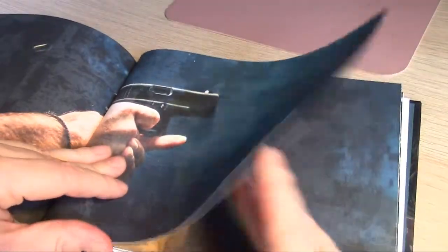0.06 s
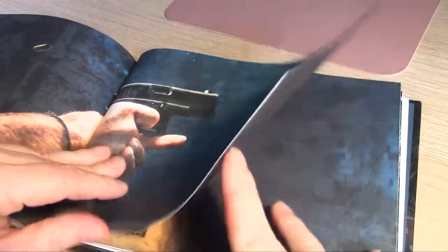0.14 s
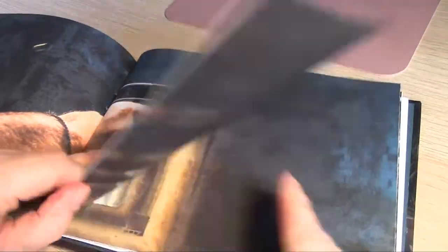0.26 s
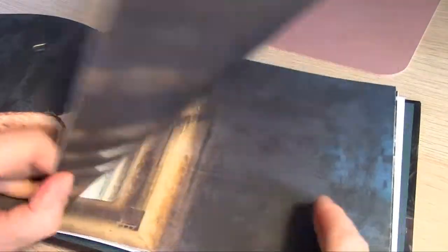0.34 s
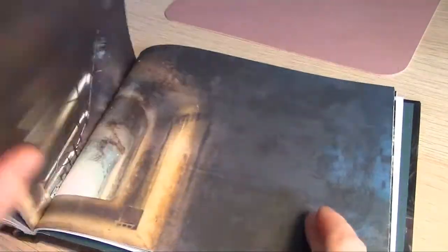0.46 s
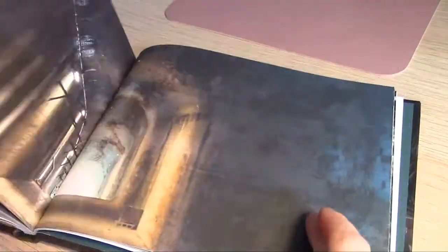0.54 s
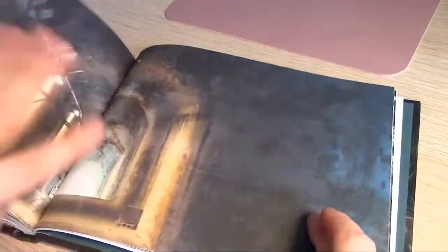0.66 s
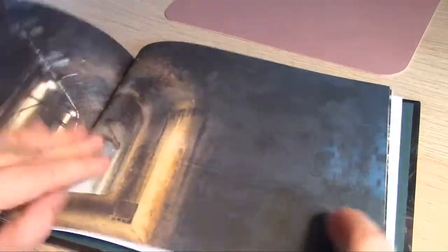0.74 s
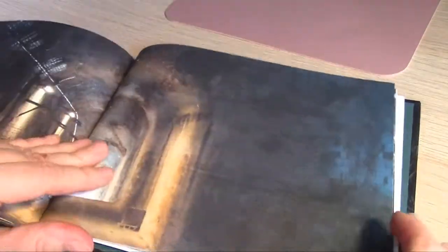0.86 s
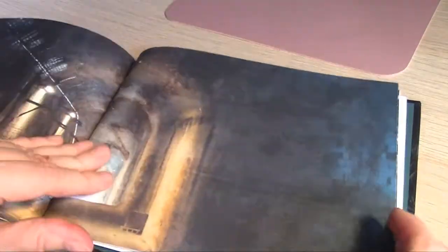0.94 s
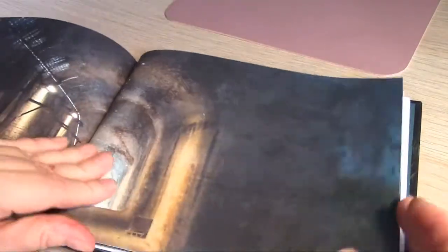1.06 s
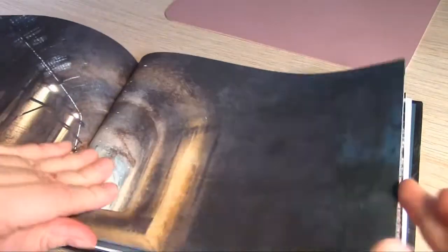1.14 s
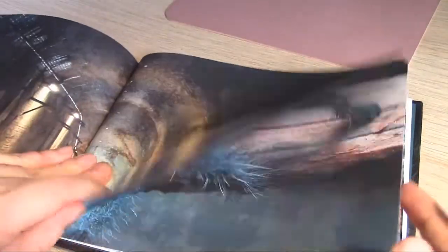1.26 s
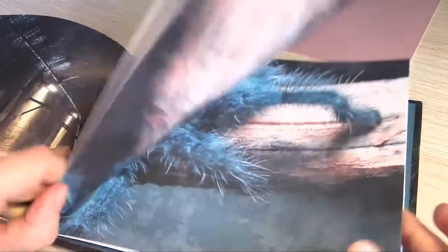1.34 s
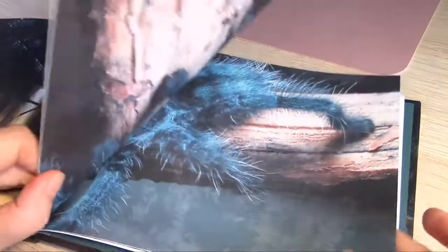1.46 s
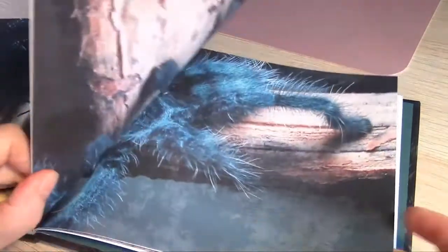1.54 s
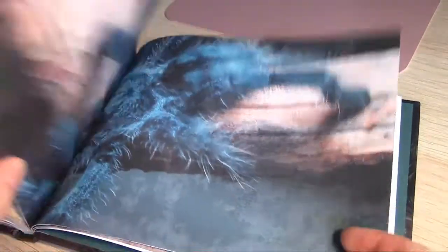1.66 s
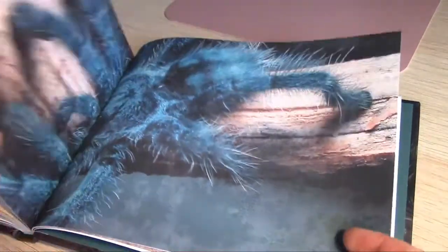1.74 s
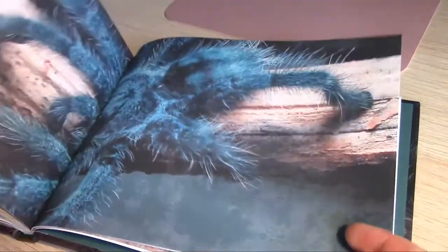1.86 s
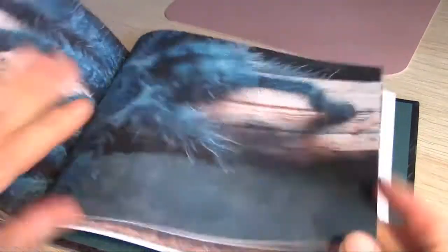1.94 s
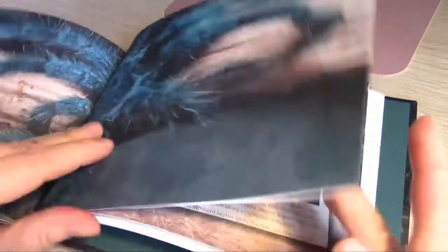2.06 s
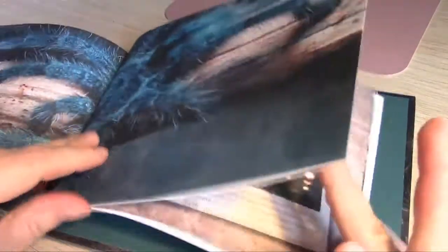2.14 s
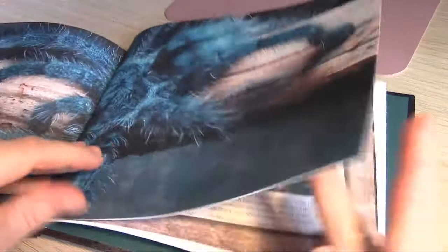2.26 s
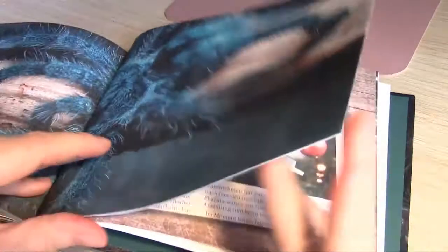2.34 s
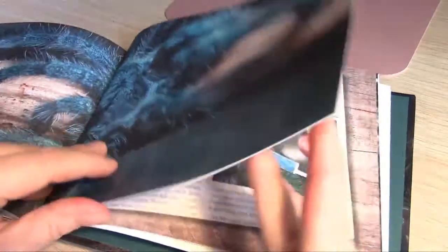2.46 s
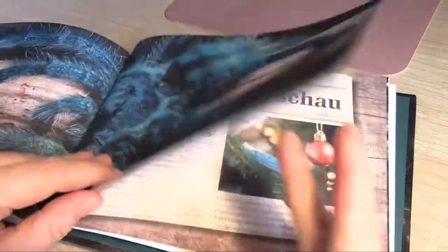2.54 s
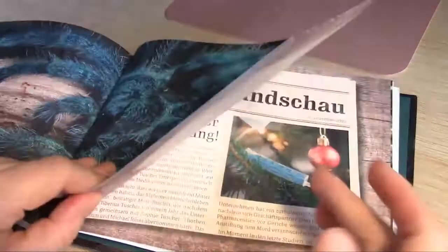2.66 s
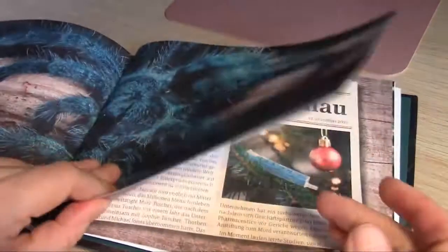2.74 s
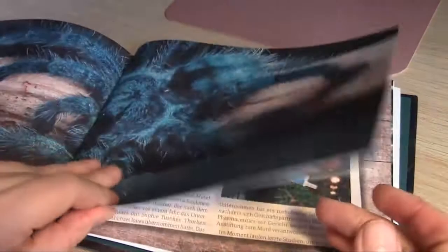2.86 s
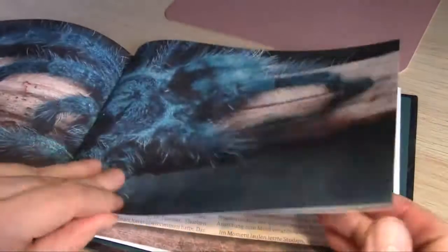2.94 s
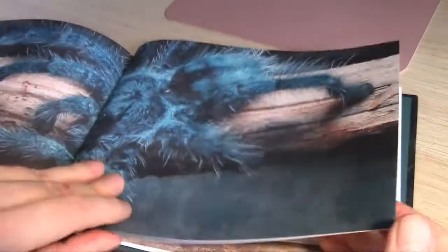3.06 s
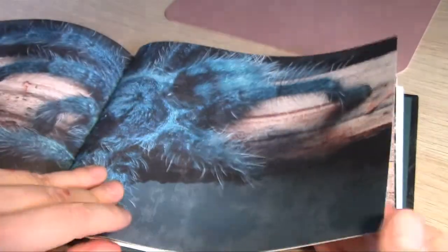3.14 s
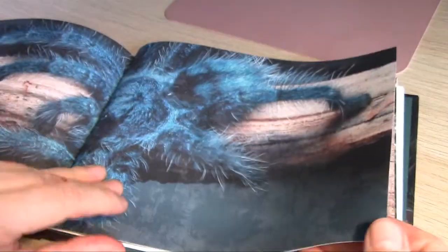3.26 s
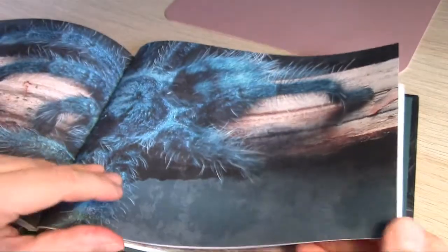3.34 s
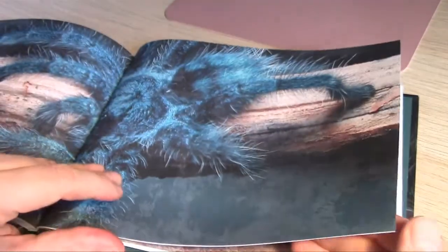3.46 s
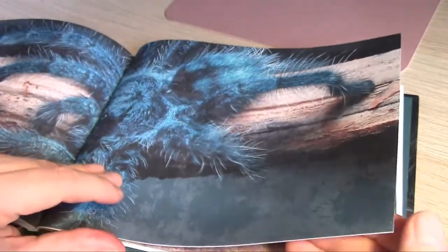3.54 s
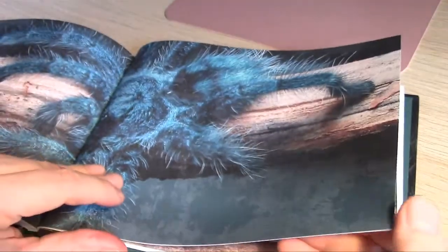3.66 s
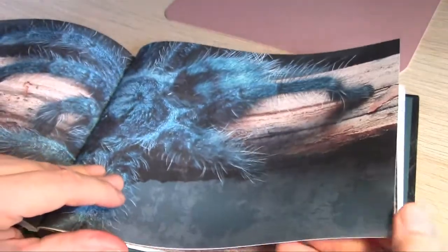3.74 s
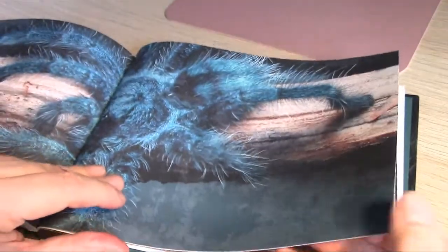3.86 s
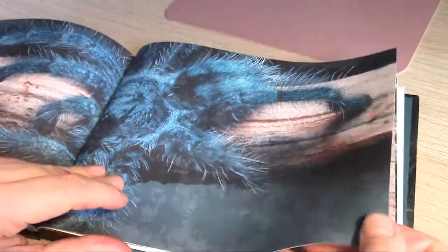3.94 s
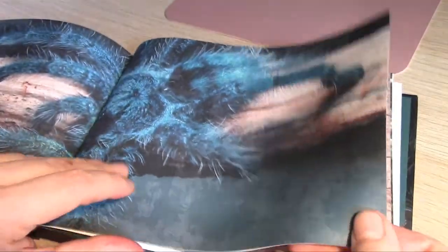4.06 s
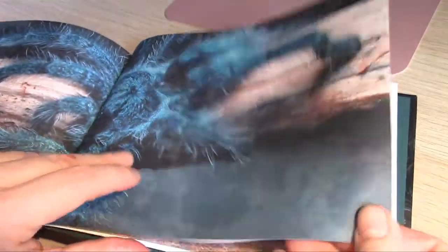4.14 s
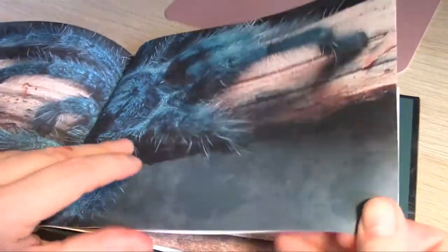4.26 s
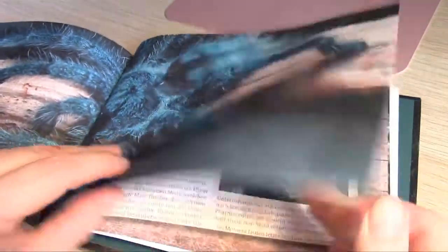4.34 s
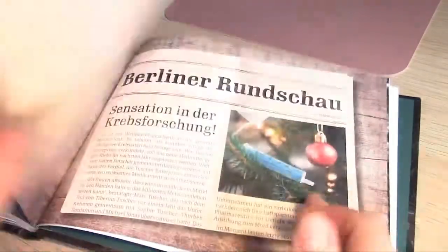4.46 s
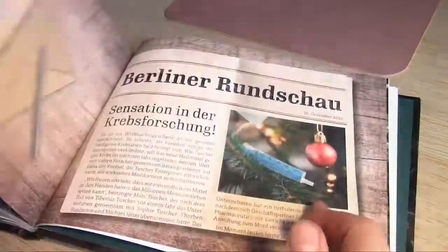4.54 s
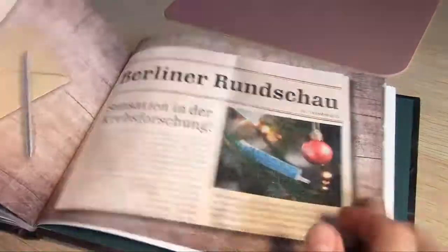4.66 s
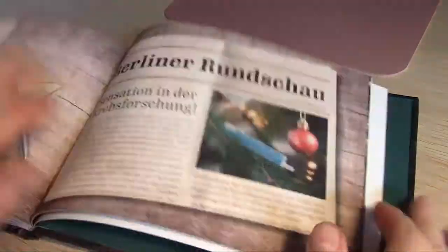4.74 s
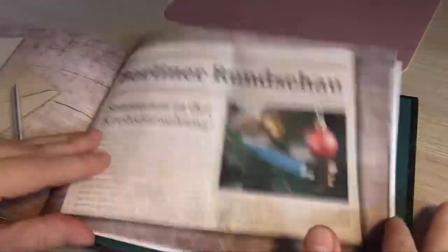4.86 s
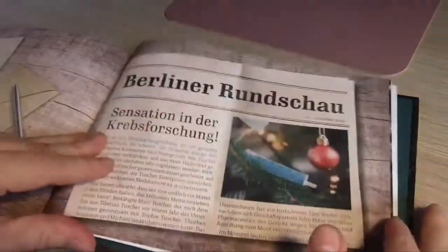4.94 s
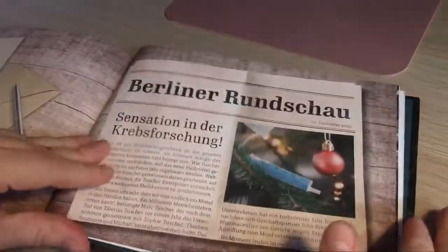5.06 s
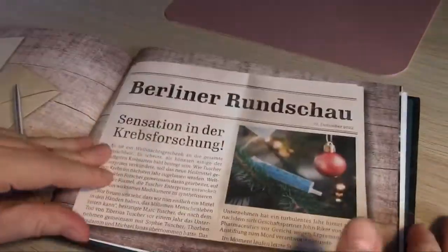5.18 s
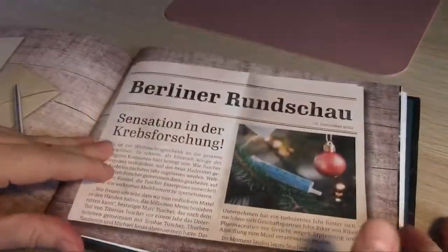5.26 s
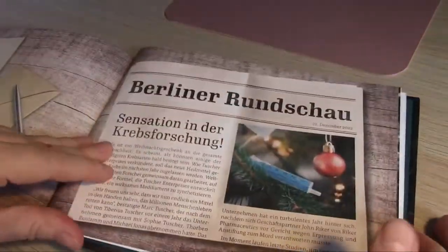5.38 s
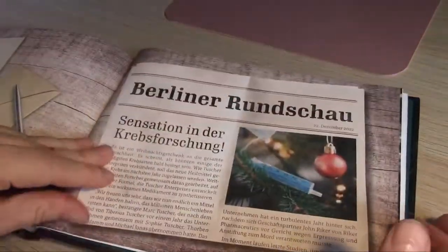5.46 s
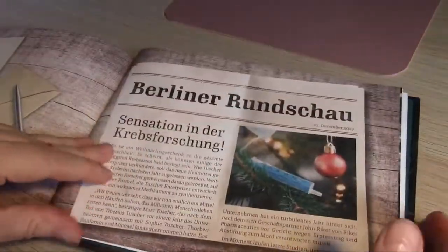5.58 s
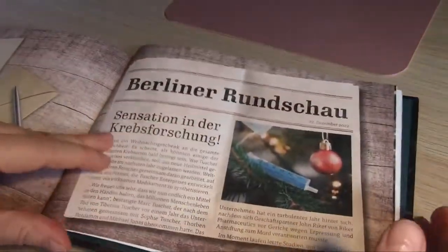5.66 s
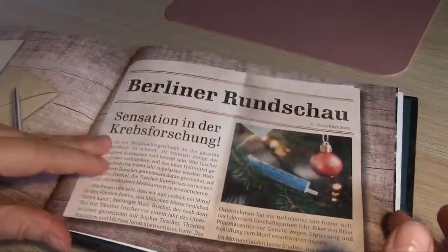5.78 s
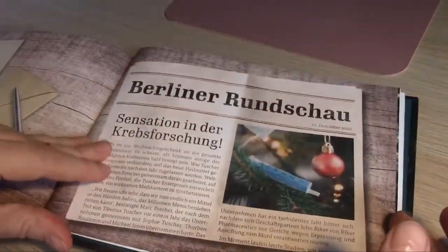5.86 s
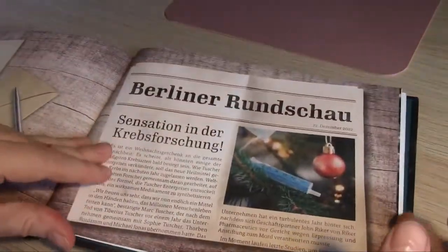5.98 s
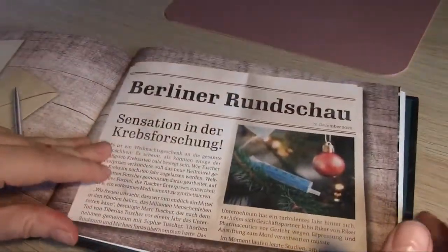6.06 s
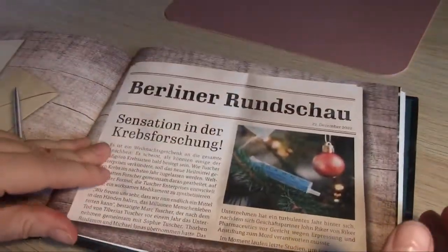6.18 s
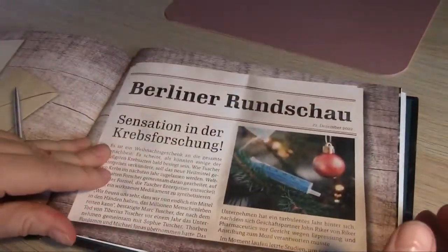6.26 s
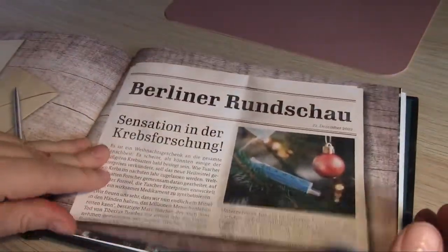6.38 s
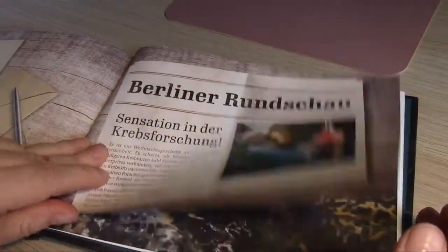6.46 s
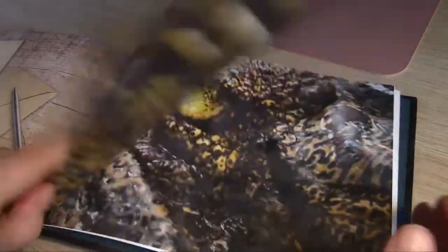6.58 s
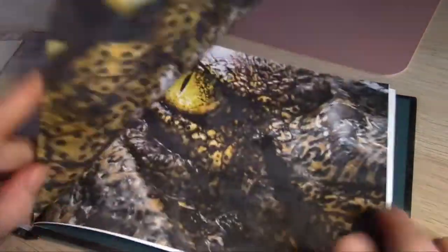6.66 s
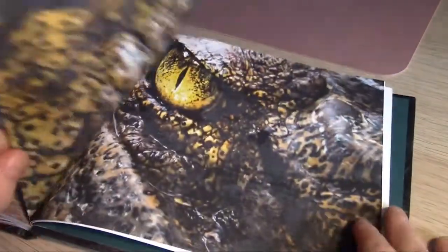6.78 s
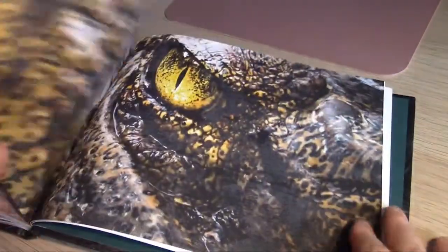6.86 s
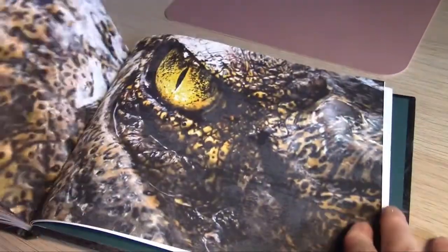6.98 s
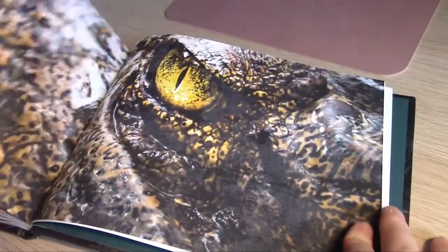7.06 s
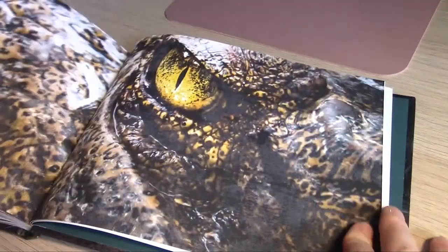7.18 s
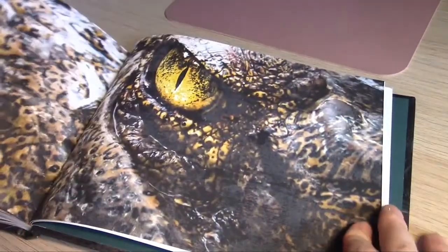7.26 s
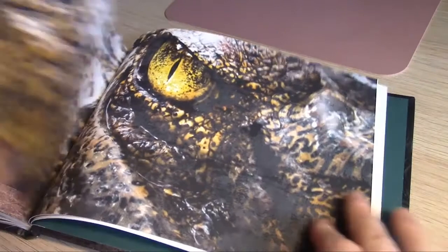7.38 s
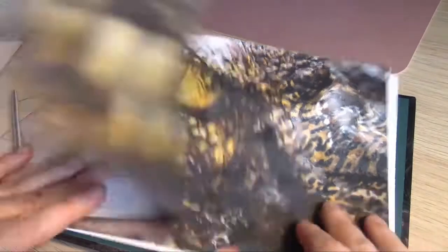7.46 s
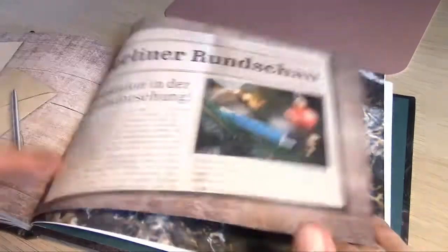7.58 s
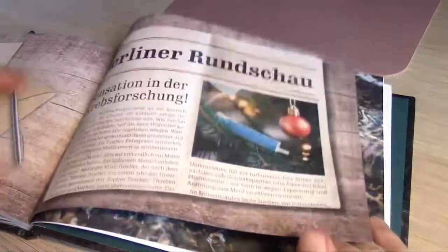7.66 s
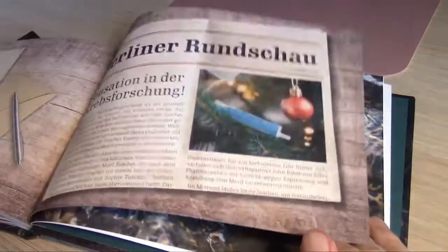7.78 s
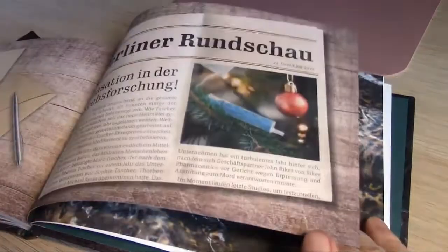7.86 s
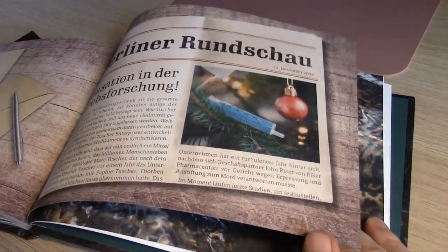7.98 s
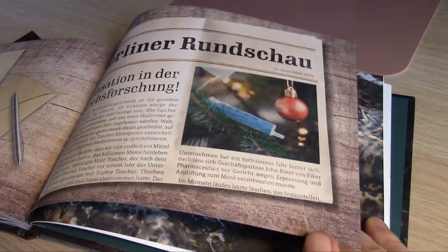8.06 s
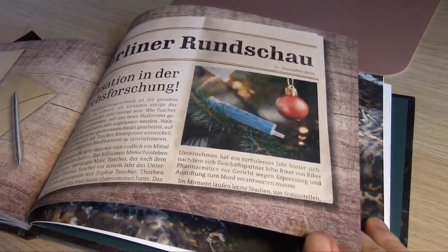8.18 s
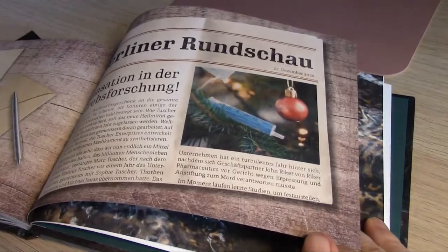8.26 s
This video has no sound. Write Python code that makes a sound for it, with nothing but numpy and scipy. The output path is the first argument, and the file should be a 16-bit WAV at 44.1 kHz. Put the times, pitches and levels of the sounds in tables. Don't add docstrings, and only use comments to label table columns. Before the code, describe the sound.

Stiff glossy pages turned close by: grainy hiss, one hard early knock, edge ticks, hollow pops, a soft lull, then brisk slides again.

```python
import sys
import numpy as np
from scipy import signal
from scipy.fft import rfft, irfft, next_fast_len
from scipy.io import wavfile
from scipy.ndimage import uniform_filter1d

SR = 44100
rng = np.random.default_rng(int(sys.argv[2]) if len(sys.argv) > 2 else 0)


def put_to_file(sound):
    columns = np.atleast_2d(sound).T
    safe = np.clip(columns, -1, 1)
    whole_steps = np.round(safe * 32767)
    wavfile.write(sys.argv[1], SR, whole_steps.astype(np.int16))


def boost(x):
    u = np.asarray(x, float) / 20
    return 10 ** u


N = 366912

# time_s, level_db
TOUCH = [(0, -85), (0.6, -74), (1.06, -66.5), (1.6, -60), (1.9, -64.5), (2.5, -65.5), (2.88, -68.5),
         (3.6, -71), (4.1, -65.5), (4.65, -57), (4.83, -61), (5.1, -63), (5.6, -67), (6.1, -70),
         (6.47, -72.5), (6.85, -58.5), (7.3, -62), (8.13, -68)]
TOUCH_GLOSS_DB, TOUCH_FLEX_DB, TOUCH_BULK_DB = -8, -1.5, -1.5
# peak_s, slide_db, gloss_db, rise_s
DRAGS = [(1.506, -49.5, -61, 0.45), (1.981, -52.5, -53.5, 0.024), (2.232, -48, -49, 0.14),
         (2.654, -50, -50, 0.075), (2.801, -61.5, -68, 0.095), (3.684, -64, -71, 0.1),
         (4.028, -63, -68, 0.03), (4.741, -53, -55, 0.1), (5.733, -57, -60, 0.14),
         (6.029, -64, -72.5, 0.057), (7.519, -50, -51, 0.18), (7.675, -54, -59, 0.082),
         (7.949, -56.5, -69, 0.27)]
# peak_s, slide_db, gloss_db, fall_s
FLICKS = [(0.0, -46.5, -48, 0.044), (0.062, -53, -74, 0.059), (0.272, -65, -84, 0.17),
          (0.569, -52, -61, 0.016), (1.44, -45, -48, 0.047), (2.028, -43, -51.5, 0.039),
          (2.29, -55.5, -56.5, 0.18), (2.911, -58, -59, 0.07), (4.505, -57, -49.5, 0.096),
          (4.865, -50, -54.5, 0.12), (4.943, -54, -54, 0.016), (5.5, -59, -59.5, 0.096),
          (5.949, -50.5, -55, 0.025), (6.645, -45.5, -52, 0.03), (6.925, -57.5, -51.5, 0.16),
          (7.396, -49, -52.5, 0.23), (8.163, -63, -62.5, 0.36)]
# peak_s, slide_db, gloss_db, rise_and_fall_s
SWEEPS = [(1.925, -58, -62, 0.013), (2.07, -58, -54, .02), (2.36, -57, -59, .04), (2.47, -71, -66, .015),
          (4.95, -58, -62, 0.024), (0.17, -57, -60, 0.58), (0.36, -52.5, -57.5, 0.42),
          (0.428, -49.5, -48, 0.078), (0.74, -62.5, -58.5, 0.18), (7.99, -75, -84, 0.033),
          (3.39, -70, -62.5, 0.024), (4.01, -73, -65, .02), (1.275, -70, -60.5, 0.098),
          (1.71, -50, -50.5, 0.13), (2.178, -46.5, -64, 0.042), (3.16, -56.5, -64, 0.15),
          (4.426, -55.5, -54.5, 0.12), (4.426, -50.5, -51.5, 0.023), (1.232, -62, -54, 0.016),
          (1.291, -62, -58, 0.012), (1.34, -56, -51.5, 0.019), (5.186, -57, -66, 0.053),
          (5.338, -49, -58, 0.025), (5.471, -54.5, -69, 0.0081), (5.839, -55, -61.5, 0.034),
          (6.522, -44.5, -51, 0.017), (7.151, -61, -56, 0.12), (7.81, -64, -48.5, 0.15),
          (8.32, -59, -64, 0.13)]
# start_s, end_s, slide_db, gloss_db
SWISHES = [(1.68, 1.722, -51, -50), (1.808, 1.826, -66, -58), (0.407, 0.45, -60, -60),
           (0.472, 0.503, -58, -58), (0.562, 0.578, -54, -63), (0.805, 0.88, -52, -50.5),
           (3.373, 3.448, -61, -71.5), (3.466, 3.525, -63, -75), (3.778, 3.826, -62, -68),
           (6.497, 6.535, -53.5, -56), (6.582, 6.614, -61, -63), (6.634, 6.762, -47, -47.5),
           (6.797, 6.86, -57.5, -60.5), (7.618, 7.692, -49, -60), (5.51, 5.535, -56, -56)]
# peak_s, flex_db, bulk_db, fall_s
JOLTS = [(0.269, -42, -68, 0.046), (0.587, -46, -39, 0.025), (0.827, -51, -47, 0.039),
         (2.038, -48, -47.5, 0.037), (2.585, -59, -60, 0.21), (2.95, -64, -61, 0.088),
         (4.256, -51, -57.5, 0.12), (4.482, -66, -62, 0.027), (4.85, -55.5, -56, 0.3),
         (5.505, -60, -56.5, 0.043), (5.953, -57.5, -54.5, 0.076), (7.017, -60, -54.5, 0.22),
         (7.168, -48, -49, 0.047), (7.441, -73, -55, 0.23), (7.628, -43.5, -60, 0.072)]
# peak_s, flex_db, bulk_db, rise_and_fall_s
BOWS = [(0.0, -73, -60, 0.19), (0.38, -56, -58, 0.43), (1.448, -47.5, -72, 0.048), (1.853, -79, -54, 0.095),
        (2.18, -45.5, -57, 0.059), (2.265, -43.5, -43.5, 0.05), (4.18, -60.5, -66, 0.052),
        (4.4, -61.5, -78, 0.17), (4.627, -59, -50, 0.045), (6.69, -51.5, -51.5, 0.14),
        (6.929, -51.5, -56, 0.018), (7.331, -50.5, -54.5, 0.048), (7.515, -53, -48.5, 0.053)]
# peak_s, flex_db, bulk_db, rise_s
PRESSES = [
    (0.635, -57, -52, .05),
    (0.865, -56, -52.5, 0.13),
    (5.744, -54.5, -58, 0.046),
    (7.69, -40, -47.5, 0.04),
]
SPAN_DB = 12
START_S, STOP_S, JOLT_S, SETTLE_S, SWISH_EDGE_S = 0.011, 0.032, 0.014, 0.02, 0.011

# time_s, resonance_hz, strength_db
WEDGE = [(0, 3200, -9), (0.44, 3450, -9.5), (0.56, 2300, -15), (1.6, 2680, -12.5), (1.69, 4100, -5.5),
         (1.74, 2500, -1.5), (2.3, 2430, -5.5), (2.65, 3320, -2.5), (2.91, 2070, -12.5), (3.3, 2970, -5),
         (4.2, 2150, -5.5), (4.45, 2670, -9.5), (5.4, 3230, -17), (6.6, 2740, -12), (6.68, 4190, -16),
         (6.76, 4460, -3), (6.8, 2480, -12), (8.32, 3190, -5)]
# frequency_hz, density_db
SLIDE_SPECTRUM = [(710, -33), (1200, 4), (2040, 6), (2610, 4), (4130, 2), (5040, -6), (6500, -17),
                  (8450, -84)]
# frequency_hz, density_db
GLOSS_SPECTRUM = [(2350, -38), (4000, -6.5), (5100, 2), (6900, 4.5), (7310, 7), (9720, 2.5), (13400, -11.5),
                  (16000, -15.5)]
# frequency_hz, density_db
FLEX_SPECTRUM = [(350, -125), (600, 14.5), (1050, 11), (1500, -2.5), (2200, -21)]
# frequency_hz, density_db
BULK_SPECTRUM = [(30, -45.5), (60, 3), (95, 4), (300, 7.5), (550, 0.5), (900, -70)]
# time_s, level_db, ring_hz
SCRAPE = [
    (0, -90, 1100),
    (7.29, -91, 1100),
    (7.32, -55.5, 1230),
    (7.37, -44.5, 1670),
    (7.4, -44, 2570),
    (7.46, -59, 3530),
    (7.49, -90, 3700),
]

# start_s, peak_db, ring_hz, top_db
TICKS = [(1.053, -38.5, 3000, 4.5), (1.0953, -27, 2250, -7), (1.1278, -38, 2150, 1),
         (1.1644, -34.5, 2180, 2), (2.2519, -22, 1400, 2.5), (2.2949, -34.5, 1130, -2),
         (1.798, -52, 3000, 8), (1.968, -47, 2600, 7), (4.849, -37, 1500, 0), (7.445, -32, 2000, -6),
         (7.496, -33, 1700, -8), (3.0612, -47, 1800, 2), (2.587, -40, 3220, 5.5),
         (2.9025, -33.5, 1700, 0.5), (2.936, -43, 1440, 7), (3.193, -34, 2000, 6.5),
         (4.339, -33.5, 1490, -4.5), (4.594, -43, 2190, 0), (4.764, -26, 2660, 0.5),
         (5.499, -27, 2800, 2.5), (5.5404, -29.5, 2600, -0.5), (5.8468, -39, 1300, -2),
         (5.9413, -38.5, 1250, 6.5), (6.0144, -28.5, 2900, -3.5), (7.3337, -44, 3000, 6),
         (8.1453, -43.5, 1300, -2.5)]
# start_s, peak_db, ring_hz, top_db, t60_s
MORE_TICKS = [(0.5615, -39, 1500, -14, 0.012), (0.7986, -28.5, 1980, -5.5, 0.022),
              (1.4326, -33.5, 2900, -5, 0.015), (2.0244, -20.5, 1310, -16.5, 0.026),
              (2.1057, -36, 1540, -12, 0.014), (2.1822, -34, 2450, -2, 0.02), (2.2298, -25, 2420, -22, 0.036),
              (2.918, -40.5, 1670, 0.5, 0.02), (4.2389, -28, 1210, -8.5, 0.018),
              (4.2635, -28, 1230, -6.5, 0.018), (.2655, -29, 2920, -20, .02), (4.8529, -28, 1850, -7, 0.025),
              (4.8793, -32, 2750, -9, 0.049), (5.0966, -28, 2470, -6, 0.012), (5.1263, -32, 2350, -7, 0.0094),
              (5.2277, -34.5, 3400, -5.5, 0.024), (5.5735, -44, 2300, -1, 0.026), (5.981, -36, 3830, -7, 0.0069),
              (6.7194, -27.5, 4100, -22, 0.021), (7.671, -28.5, 1500, -15, 0.032)]
TICK_T60_S = 0.0082
ECHO_S, ECHO_DB = 0.00027, -5
# start_s, peak_db, ring_hz, thump_db, t60_s
KNOCK = (.2645, -11, 1330, -21, .05)
# frequency_hz, level_db
KNOCK_MODES = [(985, -15), (1690, -15)]
KNOCK_EDGE_HZ = 1800
# start_s, peak_db, ring_hz, thump_db, t60_s
POPS = [(0.572, -29.5, 800, -1, 0.07), (0.799, -39, 978, 2, 0.011), (1.372, -47.5, 1050, 3, 0.034),
        (1.432, -45.5, 653, 7.5, 0.079), (1.827, -51, 680, 13, 0.04), (2.254, -25, 706, -22, 0.089),
        (2.301, -32.5, 690, -27, 0.082), (2.9, -33.5, 695, 3.5, 0.013), (2.916, -40, 900, 0.5, 0.035),
        (2.937, -40, 805, -1, 0.043), (4.473, -44.5, 500, -1, 0.055), (5.354, -50.5, 404, 7, 0.029),
        (0.817, -50, 500, 0, 0.024), (4.619, -45, 500, 4.5, 0.052), (4.487, -34.5, 940, 1.5, 0.02),
        (4.594, -50, 689, 6, 0.082), (4.655, -34, 690, -1, 0.055), (4.847, -30, 800, -34, 0.033),
        (5.405, -44, 1090, -6, 0.04), (5.498, -32.5, 1220, -16, 0.045), (5.848, -42, 1090, -10, 0.034),
        (5.938, -34.5, 930, -9.5, 0.03), (6.596, -45, 503, 8.5, 0.022), (7.013, -47.5, 700, 0, 0.062),
        (7.077, -47, 1000, -5, 0.034), (7.165, -29.5, 770, -2.5, 0.082), (7.445, -42, 500, 6.5, 0.05),
        (7.52, -32.5, 774, -34, 0.078), (7.611, -29, 780, -12, 0.068), (7.656, -30.5, 930, -14.5, 0.044),
        (4.2383, -29.5, 790, -5.5, 0.016), (4.2632, -33.5, 760, -7.5, 0.021),
        (0.5755, -37, 1490, -20, 0.022)]
THUMP_HZ = 304
# start_s, peak_db, ring_hz, top_db, t60_s
SCUFFS = [(0.0577, -41.5, 1420, -2, .03), (2.773, -53, 1500, 3, 0.035), (2.79, -44.5, 1980, 5, 0.031),
          (2.952, -49, 1540, -1, 0.026), (3.052, -54.5, 2000, 8.5, 0.19), (3.1528, -44, 2600, -3, 0.058),
          (3.201, -51, 2020, 2, .015), (3.2505, -40, 2440, -6.5, 0.07), (3.525, -45, 1840, -8.5, 0.078),
          (3.8307, -48, 1300, -0.5, 0.024), (3.9804, -49, 2630, -8, .03), (4.0327, -47.5, 1600, 2, 0.025),
          (4.1083, -48.5, 1570, -4, 0.049), (4.2132, -41, 2030, -2, 0.071), (4.724, -40, 2700, -13, .07),
          (4.508, -48, 2500, 8, .05), (5.038, -42, 3000, -1, 0.011), (5.052, -55, 1500, 1, .03),
          (5.179, -40.5, 2860, -4, 0.027), (5.191, -43.5, 1190, -1, 0.029), (5.321, -43, 1180, -6, .03),
          (5.391, -50, 2500, -2, .03), (5.4138, -46, 2710, -2, 0.031), (5.462, -49, 3000, 0, 0.032),
          (5.477, -51, 1300, -13, 0.011), (6.034, -46.5, 3000, -1, 0.025), (6.047, -50, 2500, -3, .02),
          (6.306, -48, 2800, 0.5, 0.034), (6.432, -52.5, 1500, -4, 0.036), (1.033, -47, 1980, -5, .02),
          (1.138, -48, 2660, 2, 0.01), (6.4462, -55, 2430, 3, 0.052), (6.491, -52, 2700, -2, 0.046),
          (6.703, -33, 2500, -5, 0.047), (6.744, -36, 4200, -12, .03), (6.7992, -44, 1890, -16, 0.066),
          (6.9203, -46, 1200, -8, 0.039), (7.384, -34.5, 2490, -18, 0.06), (7.58, -47, 2690, -15, 0.049),
          (7.62, -29.5, 1090, -19, .07), (7.689, -40, 1200, -10, 0.046)]
SCUFF_RISE_S = 0.00076
# start_s, end_s,
# level_db, pitch_hz, width_hz
POCKETS = [(6.66, 6.76, -52, 4180, 260), (6.69, 6.72, -52, 1800, 150), (6.92, 7.0, -57, 5170, 580),
           (6.93, 6.98, -58, 3650, 320), (1.66, 1.75, -52, 3600, 1300), (1.85, 1.92, -61, 2600, 400),
           (1.44, 1.51, -55, 6500, 900), (4.38, 4.435, -60, 6500, 700), (5.5, 5.53, -52, 1070, 170),
           (5.71, 5.75, -55.5, 1070, 170), (5.94, 5.99, -51.5, 1060, 170), (7.375, 7.41, -46.5, 2600, 640),
           (4.937, 4.955, -50, 800, 600), (1.82, 1.845, -50, 360, 90), (7.13, 7.165, -54, 330, 90),
           (0.59, 0.632, -48, 386, 170), (8.16, 8.32, -65, 3500, 460), (7.41, 7.53, -54, 2800, 1000),
           (7.578, 7.61, -54, 2800, 600), (2.15, 2.21, -56, 2500, 320), (2.3, 2.32, -46, 755, 180),
           (4.415, 4.44, -55, 1900, 1400), (0.285, 0.345, -52, 1350, 800)]

# frequency_hz, t60_s
ROOM = [(100, 0.13), (1000, 0.11), (4000, 0.067), (14000, 0.063)]
# frequency_hz, side_minus_mid_db
SPREAD = [(60, -38), (150, -37), (380, -36), (950, -16), (2380, -9.5), (5980, -4.5), (15000, -3)]
# frequency_hz, density_db
AIR_SPECTRUM = [(15, -49), (25, -19), (270, 6.5), (591, 2), (1520, -4), (2480, -12), (5000, -17),
                (16000, -49)]
AIR_DB = -69.5
LOW_CUT_HZ, TOP_HZ = 83, 15750


def strokes():
    scrape_db, scrape_hz = curves(SCRAPE)
    scrape = boost(scrape_db) * evened(resonate(rng.standard_normal(N), scrape_hz, width=320))
    z = signal.stft(rubbing() + bending() + scrape, nperseg=512, noverlap=384)[2]
    patches = rng.standard_normal(z.shape[::-1]).T
    for _ in range(2):
        patches = uniform_filter1d(patches, size=4, axis=0)
        patches = uniform_filter1d(patches, size=16, axis=1)
    z = z * boost(1.7 * evened(patches))
    return signal.istft(z, nperseg=512, noverlap=384)[1][:N]


def rubbing():
    moves = [(*row, STOP_S) for row in DRAGS]
    moves += [(*row[:3], START_S, row[3]) for row in FLICKS]
    moves += [(*row, row[3]) for row in SWEEPS]
    moves += [(s, a, b, SWISH_EDGE_S, SWISH_EDGE_S, end - s) for s, end, a, b in SWISHES]
    slide_db, gloss_db = effort([0, TOUCH_GLOSS_DB], moves)
    grip_db = 1.3 * wander(0.006) + 1.0 * wander(0.018)
    drive = slips(per_s=1500, spread_db=2.6, share=0.7)

    wedge_hz, wedge_db = curves(WEDGE)
    hz = wedge_hz * (1 + 0.03 * wander(0.02))
    wedge = resonate(resonate(drive, hz, width=800), hz, width=800)
    desk = resonate(drive, 2700 * (1 + 0.04 * wander(0.08)), width=560)
    cavities = evened(wedge) + 0.4 * evened(desk)
    slide = evened(evened(colour(drive, SLIDE_SPECTRUM)) + boost(wedge_db) * cavities)

    sheen = resonate(drive, 6600, width=900)
    gloss = evened(evened(colour(drive, GLOSS_SPECTRUM)) + 0.13 * evened(sheen))
    sparkle = signal.sosfilt(signal.butter(2, 10000, "high", fs=SR, output="sos"), gloss)
    gloss += sparkle * (boost(0.11 * (gloss_db + 93.5)) - 1)
    return slide * boost(slide_db + grip_db) + gloss * boost(gloss_db + grip_db)


def bending():
    moves = [(*row[:3], JOLT_S, row[3]) for row in JOLTS]
    moves += [(*row, row[3]) for row in BOWS]
    moves += [(*row, SETTLE_S) for row in PRESSES]
    flex_db, bulk_db = effort([TOUCH_FLEX_DB, TOUCH_BULK_DB], moves)
    bend = slips(per_s=200, spread_db=3, share=0.5) * boost(2.2 * wander(0.012))
    sheet_mode = evened(resonate(bend, 1010, width=110))
    flex = evened(evened(colour(bend, FLEX_SPECTRUM)) + 0.5 * sheet_mode)
    bulk = evened(colour(bend, BULK_SPECTRUM))
    return flex * boost(flex_db) + bulk * boost(bulk_db)


def slips(per_s, spread_db, share):
    size = boost(spread_db * np.minimum(rng.exponential(1, N), 5))
    size = size * (rng.random(N) < per_s / SR)
    hiss, sign = rng.standard_normal((2, N))
    return evened(hiss + share * evened(size * np.sign(sign)))


def effort(rest_db, moves):
    t = np.arange(0, N, 32) / SR
    touch_db = np.interp(t, *np.transpose(TOUCH))
    power = boost(2 * (touch_db + np.array(rest_db)[:, None]))
    for s, a_db, b_db, rise, fall, *hold in moves:
        before = (s - t) / max(rise, 0.004)
        after = (t - s - sum(hold)) / max(fall, 0.004)
        away = np.maximum(np.maximum(before, after), 0)
        power = power + boost(2 * (np.array([[a_db], [b_db]]) - SPAN_DB * away))
    return [np.interp(np.arange(N) / SR, t, 10 * np.log10(p)) for p in power]


def ticks():
    edges = sorted(MORE_TICKS + [(*row, TICK_T60_S) for row in TICKS])
    out, noise = np.zeros(N), rng.standard_normal((len(edges), 2, 3000))
    for (s, db, hz, top_db, t60), (a, b) in zip(edges, noise):
        ring = burst(a, hz, 0.75 * hz + 300, t60, rise=0.0007, jerk=1.6)
        top = burst(b, 5800, 6200, 1.1 * t60, rise=0.0005, jerk=0.7)
        top = top + boost(ECHO_DB) * np.roll(top, round(ECHO_S * SR))
        add(out, s + 0.0003, boost(db) * (ring + boost(top_db - 1.5) * top))
    return out


def knock():
    s, db, hz, thump_db, t60 = KNOCK
    out, (a, b) = np.zeros(N), rng.standard_normal((2, 8000))
    swings = burst(a, hz, 1180, t60, rise=0.002, jerk=3.2)
    swings = signal.sosfilt(signal.butter(8, KNOCK_EDGE_HZ, fs=SR, output="sos"), swings)
    swings = swings / abs(swings).max()
    for mode_hz, mode_db in KNOCK_MODES:
        swings = swings + boost(mode_db) * burst(a, mode_hz, 200, 1.17 * t60, rise=0.0015, jerk=1.4)
    thump = burst(b, 232, 250, 1.0 * t60, rise=0.012)
    add(out, s, boost(db) * (swings + boost(thump_db) * thump))
    return out


def pops():
    out, noise = np.zeros(N), rng.standard_normal((len(POPS), 2, 8000))
    for (s, db, hz, thump_db, t60), (a, b) in zip(POPS, noise):
        wobble = burst(a, hz, 1.07 * hz, t60, rise=0.00021, jerk=1.0)
        thump = burst(b, THUMP_HZ, 1.2 * THUMP_HZ, 1.4 * t60, rise=0.001)
        add(out, s + 0.00101, boost(db) * (wobble + boost(thump_db) * thump))
    return out


def scuffs():
    out, noise = np.zeros(N), rng.standard_normal((len(SCUFFS), 2, 4000))
    for (s, db, hz, top_db, t60), (a, b) in zip(SCUFFS, noise):
        ring = burst(a, hz, 1.0 * hz + 400, t60, rise=SCUFF_RISE_S)
        top = burst(b, 6200, 7700, t60, rise=SCUFF_RISE_S)
        add(out, s, boost(db) * (ring + boost(top_db) * top))
    return out


def pockets():
    out, noise = np.zeros(N), rng.standard_normal((len(POCKETS), 9000))
    for (start, end, db, hz, width), air in zip(POCKETS, noise):
        size = max(round((end - start) * SR), 200) + 600
        ring = evened(resonate(resonate(air, hz, width), hz, width))[:size]
        edges = signal.windows.tukey(len(ring), min(1200 / len(ring), 1))
        add(out, max(start - 300 / SR, 0), boost(db) * ring * edges)
    return out


def burst(noise, hz, width, t60, rise, jerk=0):
    t = np.arange(len(noise)) / SR
    wake = noise * boost(-60 * t / max(t60, 0.003)) * (1 - np.exp(-t / rise))
    wake[0] = -jerk * np.sqrt(SR / width)
    ring = wake
    for _ in range(3):
        ring = resonate(ring, hz, width)
    return ring / abs(ring).max()


def resonate(x, hz, width):
    turn = np.exp(2j * np.pi * np.cumsum(hz * np.ones(len(x))) / SR)
    r = np.exp(-np.pi * width / SR)
    return 2 * (turn * signal.lfilter([1 - r], [1, -r], x / turn)).real


def colour(x, points):
    size = next_fast_len(x.shape[-1])
    f, db = np.transpose(points)
    hz = np.fft.rfftfreq(size, 1 / SR)
    gain = boost(np.interp(np.log(hz + 1), np.log(f + 1), db))
    return irfft(rfft(x, size) * gain, size)[..., :x.shape[-1]]


def wander(seconds):
    size = max(int(seconds * SR), 2)
    return evened(uniform_filter1d(uniform_filter1d(rng.standard_normal(N), size), size))


def curves(rows):
    s, *columns = np.transpose(rows)
    return [np.interp(np.arange(N) / SR, s, c) for c in columns]


def evened(x):
    return x / np.sqrt(np.mean(x ** 2) + 1e-20)


def add(mix, s, sound):
    part = mix[round(s * SR):][:len(sound)]
    part += sound[:len(part)]


def tail():
    taps = np.zeros(SR // 2)
    at = np.arange(120, len(taps) - 20, 20) + rng.integers(0, 20, (len(taps) - 121) // 20)
    taps[at] = rng.choice([-1., 1.], len(at))
    hz, t, z = signal.stft(taps, SR, nperseg=256)
    f, t60 = np.transpose(ROOM)
    z = z * boost(-60 * t / np.interp(hz, f, t60)[:, None])
    echo = signal.istft(z, SR, nperseg=256)[1]
    return echo / np.linalg.norm(echo)


def scene():
    book = strokes() + ticks() + scuffs() + pockets() + pops() + knock()
    air = colour(rng.standard_normal((2, N)), AIR_SPECTRUM)
    air = boost(AIR_DB) * np.array([evened(v) for v in air])
    mid = book + boost(-15.5) * signal.oaconvolve(book, tail())[:N]
    housing = evened(rng.standard_normal(48)) / np.sqrt(48)
    near = signal.oaconvolve(book, housing)[:N]
    scattered = boost(-6.5) * near + boost(-28.0) * signal.oaconvolve(book, tail())[:N]
    side = colour(scattered, SPREAD) + boost(-2.0) * air[1] + 0.0144 * mid
    return np.array([mid + side, mid - side]) + air[0]


def roll_off(x):
    return signal.sosfilt(signal.butter(12, 16430, fs=SR, output="sos"), x)


def record(dry):
    cut = signal.sosfilt(signal.butter(4, LOW_CUT_HZ, "high", fs=SR, output="sos"), dry)
    cut += boost(-103) * signal.lfilter([1], [1, -0.99], rng.standard_normal(dry.shape))
    edge = signal.firwin(255, TOP_HZ, window=("kaiser", 8), fs=SR)[None]
    mix = signal.oaconvolve(cut, edge, "same")
    return roll_off(mix)


dry = scene()
out = record(dry)
put_to_file(out)
```